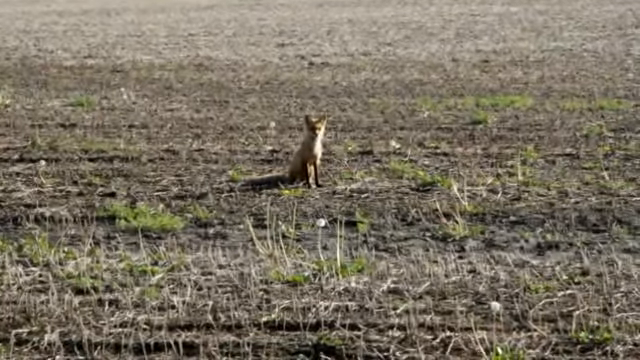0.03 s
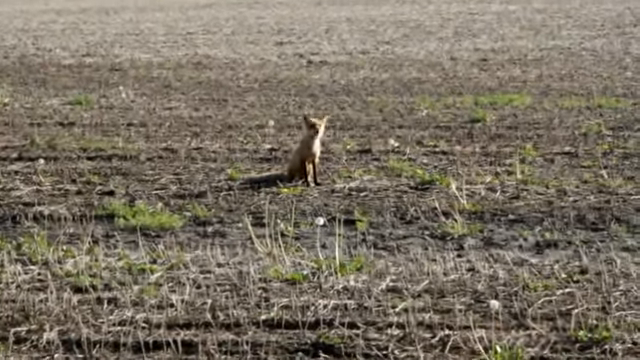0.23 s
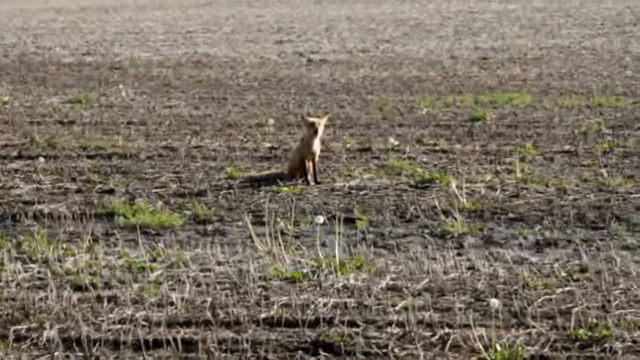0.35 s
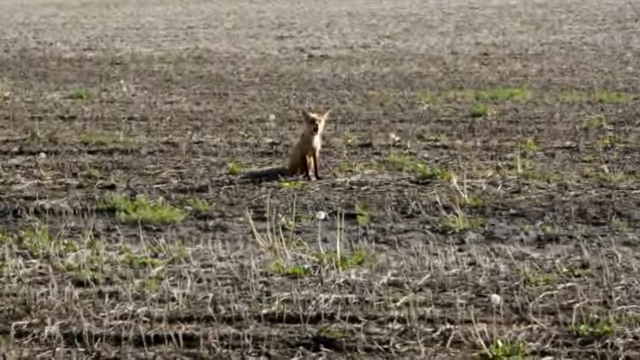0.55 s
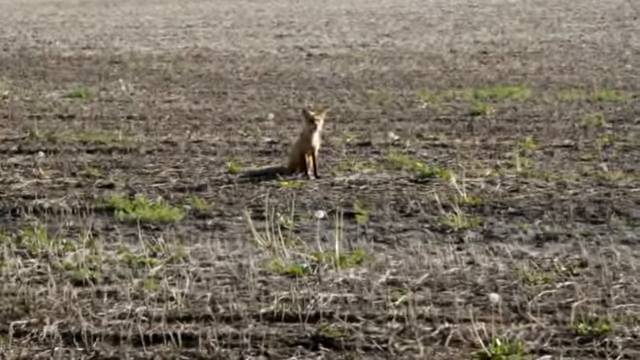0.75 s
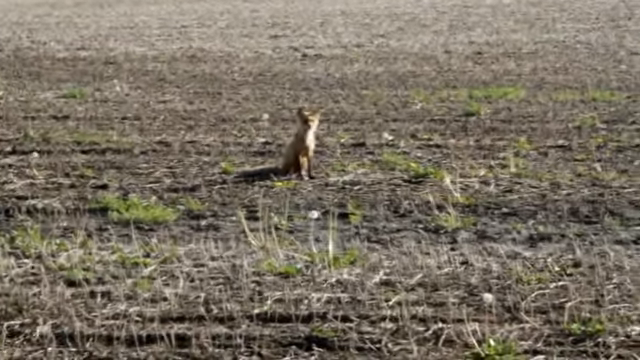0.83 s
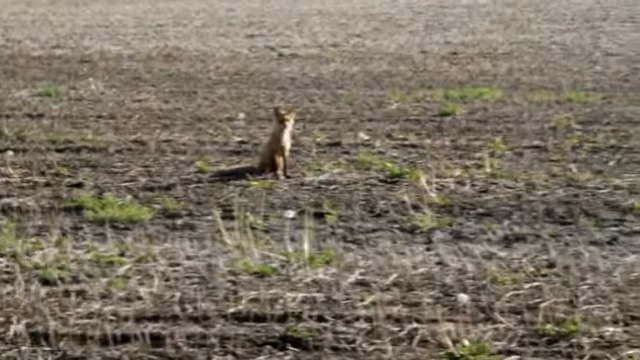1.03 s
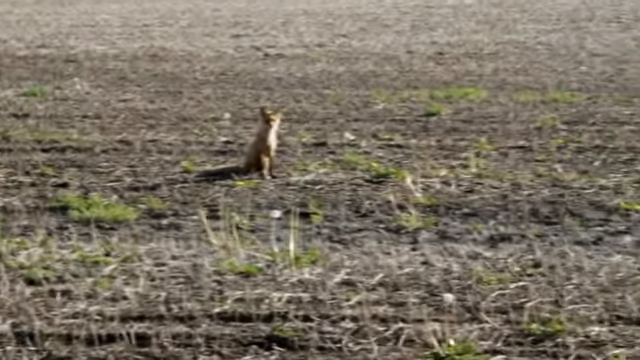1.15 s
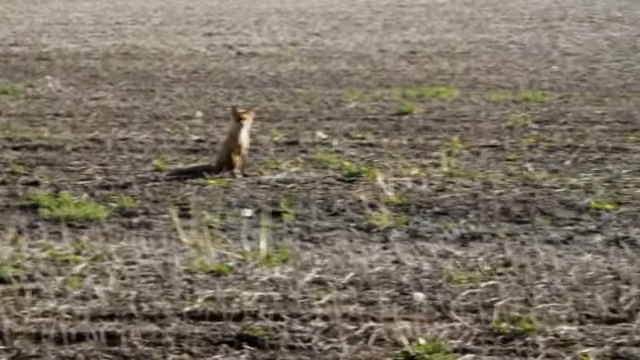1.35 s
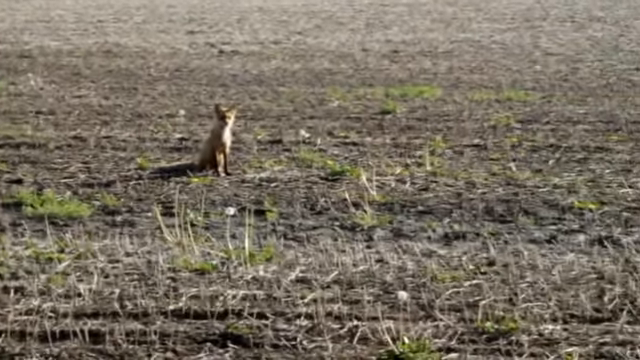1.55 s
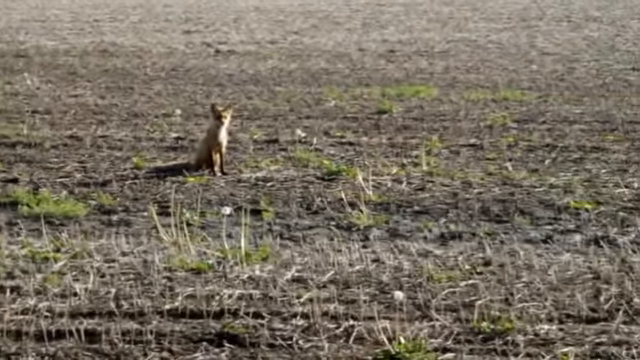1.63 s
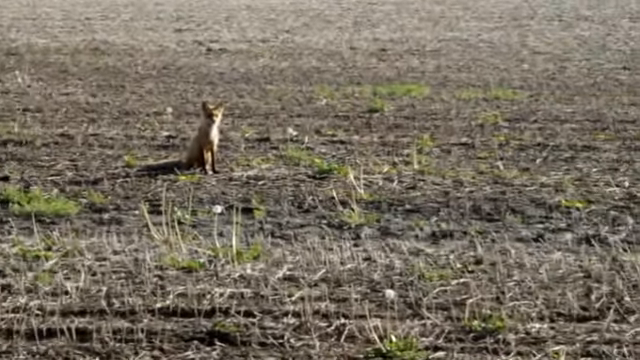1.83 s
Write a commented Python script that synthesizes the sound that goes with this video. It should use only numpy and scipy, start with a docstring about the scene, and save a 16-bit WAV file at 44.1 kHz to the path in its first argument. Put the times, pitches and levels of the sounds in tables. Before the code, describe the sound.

One hoarse fox bark starts rough and slides down into a whine, leaving a faint dull tail over open ground. Afterwards come a tiny nearby tick and a faraway bird whistle, with soft wind on the microphone.

```python
"""Light wind rumbles on the microphone in an open field; then a fox gives one harsh bark.
Its vocal folds start in a chaotic rasp while the mouth opens, lock into a buzz that repeats
every third cycle, and clear into a falling whine. The ground scatters a dull tail back.
A faint tick follows close by, and a small bird whistles far away."""
import sys
import numpy as np
from scipy import signal
from scipy.fft import rfft, irfft
from scipy.io import wavfile
from scipy.ndimage import uniform_filter1d, map_coordinates

SR = 44100
rng = np.random.default_rng(int(sys.argv[2]) if len(sys.argv) > 2 else 0)


def bounce(signal):
    """Save signal as a 16-bit WAV file at the path given by the first command-line argument."""
    frames = np.transpose(np.atleast_2d(signal))
    limited = np.clip(frames, -1, 1)
    pcm = np.round(limited * 32767).astype(np.int16)
    wavfile.write(sys.argv[1], SR, pcm)


N = 83790
T = np.arange(N) / SR

# Levels in the tables are relative, ahead of the mix gains.
# tone of the wind: f/Hz, level/dB
WIND_EQ = [(28, -21), (47, -6.5), (66, 4), (85, 1), (150, -1), (260, -6.5), (450, -11.5), (850, -10),
           (1200, -11), (2100, -15.5), (3800, -34.5), (7000, -42), (15500, -47)]
# the throat's lowest resonance swooping up: t/s, f/Hz, level/dB
WHOOP_SWEEP = [(0.213, 540, -44), (0.238, 729, -21.5), (0.261, 904, -14.5), (.281, 963, -24),
               (0.33, 1010, -28)]
# envelopes of the dark first burst and the open-mouthed rasp: t/s, level/dB
BURST_ENV = [(.218, -47), (.236, -23.5), (.272, -12), (.30, -19.5), (.38, -41)]
RASP_ENV = [(.22, -55), (.25, -28), (.272, -19.5), (.298, -18.5), (.311, -12.5), (.325, -16.5),
            (.38, -17.5), (.41, -28), (.428, -34), (.452, -19), (.48, -43), (.515, -34), (.555, -31.5),
            (.60, -44)]
# tone of the burst and the rasp: f/Hz, level/dB
BURST_EQ = [(400, -22), (800, -7), (1150, -14), (1480, -16), (1750, -4.5), (2000, 2), (2350, -11.5),
            (3300, -6), (4200, -27.5), (13000, -30.5)]
RASP_EQ = [(200, -23.5), (600, -35), (780, -12.5), (950, -5.5), (1200, -3.5), (1500, -14), (1850, 1),
           (2300, -0.5), (3050, -5), (3750, 5), (4400, -3), (5050, -1.5), (5600, -10.5), (6200, -19.5),
           (10000, -24), (13000, -20), (16000, -27)]
# pitch of the vocal folds: t/s, f/Hz
FOLD_PITCH = [(.33, 1370), (.39, 1346), (.42, 1279), (.44, 1293), (.472, 1346), (.505, 1303), (.535, 1243),
              (.604, 1184), (.66, 1117), (.708, 1060), (.72, 1015), (.765, 925), (.775, 916), (.815, 767)]
# unsteadiness of the folds: t/s, jitter/share of pitch
FOLD_JITTER = [(.33, .043), (.38, 0.0234), (.405, 0.011), (.43, 0.013), (.452, 0.034), (.475, 0.0028),
               (.56, 0.013), (.61, .002), (.69, 0.0094), (.78, 0.026)]
# envelopes of the whine's fundamental, its overtones, the buzz and the throat's ring: t/s, level/dB
ROOT_ENV = [(.3, -83), (.39, -25), (.485, -30.5), (.53, -24), (.61, -19.5), (.65, -25.5), (.69, -24.5),
            (.73, -31), (.795, -35.5), (.83, -43)]
OVERTONE_ENV = [(.33, -31), (.40, -23.5), (.455, -27), (.472, -19), (.52, -23.5), (.58, -28.5), (.655, -25),
                (.70, -29), (.745, -39), (.78, -42), (.82, -59)]
BUZZ_ENV = [(.33, -40), (.383, -20), (.394, -20.5), (.455, -19), (.48, -21.5), (.53, -27), (.58, -33.5),
            (.625, -49)]
RING_ENV = [(.38, -58), (.393, -17), (.428, -19), (.452, -34)]
# tone of the overtones and the buzz: f/Hz, level/dB
OVERTONE_EQ = [(1900, -1), (2350, -2), (2560, -17), (2750, -17), (3300, 0.5), (3650, -3), (4550, -2),
               (5100, -1), (5420, -10), (5800, -12.5), (6200, -27), (6650, -17.5), (7900, -28), (9000, -33),
               (13700, -31), (15500, -31)]
BUZZ_EQ = [(440, -26), (860, -4), (1750, -2.5), (2170, 5.5), (2500, -10), (3100, -3.5), (3500, -4),
           (4300, 0), (4800, -2), (5600, -7.5), (6800, -36), (8200, -24.5), (12500, -20.5), (16000, -46)]
# bird notes: start t/s, length/s, first f/Hz, middle f/Hz, last f/Hz, level/dB, waver/share of pitch
BIRD_NOTES = [(1.605, 0.18, 3300, 4320, 3720, -53.5, 0.023), (1.758, 0.013, 2950, 3050, 3170, -41, .015),
              (1.784, .125, 4400, 5280, 5270, -58.5, 0.0068)]

JITTER_HZ, TOP_HZ = 320.5, 15750  # speed of the fast wobbles; band limit


def amp(db):
    """Decibels to gain."""
    return 10 ** (np.asarray(db) / 20)


def unit(x):
    """Scales to rms 1."""
    return x / np.sqrt(np.mean(x ** 2) + 1e-20)


def curve(points):
    """Joins (t/s, value) points by straight lines."""
    return np.interp(T, *np.transpose(points))


def envelope(points):
    """Gain from (t/s, level/dB) points, silent outside them."""
    return amp(np.interp(T, *np.transpose(points), left=-np.inf, right=-np.inf))


def wander(hz):
    """Smooth random modulation of rms 1, rolling off above hz."""
    rolloff = 1 + (np.fft.rfftfreq(N, 1 / SR) / hz) ** 4
    return unit(irfft(rfft(rng.standard_normal(N)) / rolloff, N))


def eq(x, points, size=8192):
    """Minimum-phase EQ through (f/Hz, level/dB) points."""
    hz, db = np.transpose(points)
    bin_hz = abs(np.fft.fftfreq(size, 1 / SR))
    log_gain = np.log(amp(np.interp(np.log(bin_hz + 1), np.log(hz), db)))
    taps = np.fft.ifft(np.exp(np.conj(signal.hilbert(log_gain)))).real[:size // 2]
    return signal.fftconvolve(x, taps)[:N]


def resonate(x, hz, width_hz):
    """A steep resonance at a steady or gliding frequency, scaled to rms 1."""
    carrier = np.exp(2j * np.pi * np.cumsum(hz * np.ones(N)) / SR)
    pole = np.exp(-np.pi * width_hz / SR)
    baseband = signal.lfilter([(1 - pole) ** 2], [1, -2 * pole, pole * pole], x / carrier)
    return unit((carrier * baseband).real)


def wind(rumble_top_hz=224, buffet_db=1):
    """A steady rush of air with a lumpy rumble under it."""
    air = eq(rng.standard_normal(N), WIND_EQ)
    rumble = signal.sosfiltfilt(signal.butter(2, rumble_top_hz, fs=SR, output="sos"), air)
    rush = air - rumble
    return unit(rush + rumble * amp(buffet_db * wander(hz=3.2)))


def fold_slaps(rate_hz=1048.8, jitter=.33, spread_db=2.5, air=0.72, puff_cycles=0.48):
    """Chaotic folds: pulses of uneven spacing and force, each with a puff of air."""
    turns = np.cumsum(rate_hz * np.exp(jitter * wander(rate_hz))) / SR
    cycle = turns.astype(int)
    force = amp(spread_db * np.clip(rng.standard_normal(N), -2, 2))[cycle]
    pulses = np.diff(cycle, prepend=0)
    puffs = np.exp(-(turns % 1) / puff_cycles) * rng.standard_normal(N)
    return air * unit(force * puffs) - unit(force * pulses)


def whoop(width_hz=195, squash=9.3):
    """The first chaotic pulses ring the lowest throat resonance while it rises."""
    times, sweep_hz, db = np.transpose(WHOOP_SWEEP)
    hz = np.interp(T, times, sweep_hz)
    ring = resonate(fold_slaps(), hz, width_hz)
    limited = ring / (1 + squash * abs(signal.hilbert(ring)))
    return resonate(limited, hz, 2 * width_hz) * envelope(np.transpose([times, db]))


def rasp(opening_s=(.215, .268), shut_speed=.74):
    """A dark burst, then a bright rasp; the throat's resonances rise as the mouth opens."""
    position = np.cumsum(np.interp(T, opening_s, [shut_speed, 1]))  # varispeed lifts pulses and tone
    dark = map_coordinates(unit(eq(fold_slaps(), BURST_EQ)), [position])
    bright = map_coordinates(unit(eq(fold_slaps(), RASP_EQ)), [position])
    return dark * envelope(BURST_ENV) + bright * envelope(RASP_ENV)


def ground_scatter(x, wet_db=-23, t60_s=0.94, build_s=0.0086, top_hz=1820):
    """A faint, dull tail scattered back from the open ground."""
    tail = rng.standard_normal(N) * amp(-60 * T / t60_s) * (1 - np.exp(-T / build_s))
    tail = signal.sosfilt(signal.butter(2, top_hz, fs=SR, output="sos"), tail)
    return amp(wet_db) * signal.fftconvolve(x, tail / np.linalg.norm(tail))[:N]


def jittered(hz):
    """Roughens a pitch with the unsteadiness of the folds."""
    return hz * (1 + curve(FOLD_JITTER) * wander(JITTER_HZ))


def fold_partials(hz, phase, period=3, count=41, smear_rad=1.06, swell_db=4, swell_hz=19.74):
    """Regular folds: fundamental, overtones, and a buzz between them as every third cycle differs."""
    offsets = smear_rad * rng.standard_normal(count)
    swells = swell_db * rng.standard_normal((count, count))
    unrest = wander(JITTER_HZ)
    root, overtones, buzz = np.zeros((3, N))
    for k in range(1, count):
        partial_hz = k * hz / period
        height = partial_hz / 12000  # high partials swell most, and above 12 kHz blur into hiss
        blur = height ** 3 * np.roll(unrest, k * N // count)
        partial = np.cos(k * phase / period + offsets[k] + blur) * (partial_hz < TOP_HZ)
        if k > 2 * period:
            partial *= amp(height * np.interp(T * swell_hz, np.arange(count), swells[k]))
        if k % period:
            buzz += partial
        elif k == period:
            root += partial
        else:
            overtones += partial
    return root, overtones, buzz


def voice(air_db=-17, shimmer=0.093, flutter=0.087, tiring_s=(0.23, 0.716)):
    """The buzz clears into a breathy, falling whine; its level flutters more as the voice tires."""
    hz = jittered(curve(FOLD_PITCH))
    phase = 2 * np.pi * np.cumsum(hz) / SR
    root, overtones, buzz = fold_partials(hz, phase)
    top = eq(overtones, OVERTONE_EQ) + sidebands(phase) + amp(air_db) * rng.standard_normal(N)
    whine = root * envelope(ROOT_ENV) + top * envelope(OVERTONE_ENV)
    growl = unit(eq(buzz, BUZZ_EQ)) * envelope(BUZZ_ENV)
    tiring = np.interp(T, tiring_s, [0, 1])
    shake = np.exp(shimmer * wander(JITTER_HZ) + flutter * tiring * wander(hz=69))
    return shake * (whine + growl + throat_ring(root + overtones, buzz))


def sidebands(fold_phase, whistle_hz=5130, gain_db=-25.5):
    """A second, high oscillator mixes with the folds and adds thin lines between the overtones."""
    whistle_phase = 2 * np.pi * np.cumsum(jittered(whistle_hz)) / SR
    pairs = ((1, 2), (1, 3), (2, 2))  # whistle harmonic, fold harmonic
    return amp(gain_db) * sum(np.cos(m * whistle_phase + k * fold_phase) / m for m, k in pairs)


def throat_ring(harmonics, buzz, low_hz=2274, width_hz=560, slide_hz=(4870, 3900), high_db=-4.5):
    """The buzz rings the throat as it locks: one resonance holds, a higher one slides down."""
    low = resonate(harmonics + buzz, low_hz, width_hz)
    high_hz = np.interp(T, [RING_ENV[0][0], RING_ENV[-1][0]], slide_hz)
    high = amp(high_db) * resonate(buzz, high_hz, 2 * width_hz)
    return (low + high) * envelope(RING_ENV)


def tick(start_s=0.97, gain_db=-41.5, decay_s=0.0012, hz=4230):
    """One faint, dry tick close by: a snap of broad noise."""
    decay = np.exp(-abs(T - start_s) / decay_s) * (T > start_s)
    return amp(gain_db) * resonate(rng.standard_normal(N), hz, 2 * hz) * decay


def bird(flicker_db=3):
    """Thin gliding whistles, blurred and broken by distance."""
    song = np.zeros(N)
    for start, length, first, middle, last, db, waver in BIRD_NOTES:
        progress = np.clip((T - start) / length, 0, 1)
        hz = np.interp(progress, [0, .5, 1], [first, middle, last]) * (1 + waver * wander(JITTER_HZ))
        arch = np.sqrt(abs(np.sin(np.pi * progress)))
        song += amp(db) * arch * np.sin(2 * np.pi * np.cumsum(hz) / SR)
    return song * amp(flicker_db * wander(hz=50))


def scene(fox_db=3.5, wind_db=-32):
    """The bark and its tail over a bed of wind, with bird and tick, all panned centre."""
    fox = amp(fox_db) * (whoop() + rasp() + voice())
    mix = fox + ground_scatter(fox) + amp(wind_db) * wind() + bird() + tick()
    return np.tile(mix, (2, 1))


def record(dry, threshold_db=-26, slope=0.21, window_s=0.015):
    """Mild gain control ducks the whole mix during the bark; a steep low-pass trims the top."""
    power = abs(uniform_filter1d(dry[0] ** 2, int(window_s * SR)))
    over_db = np.maximum(10 * np.log10(power + 1e-12) - threshold_db, 0)
    ducked = dry * amp(-slope * over_db)
    lowpass = signal.firwin(601, TOP_HZ, window=("kaiser", 9), fs=SR)
    return signal.oaconvolve(ducked, lowpass[None], "same", axes=1)


dry = scene()
out = record(dry)
bounce(out)
```